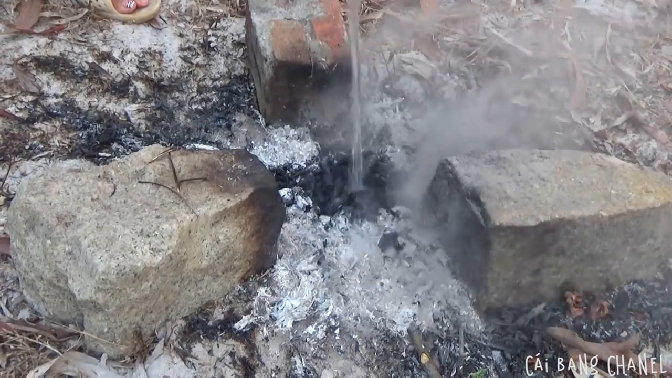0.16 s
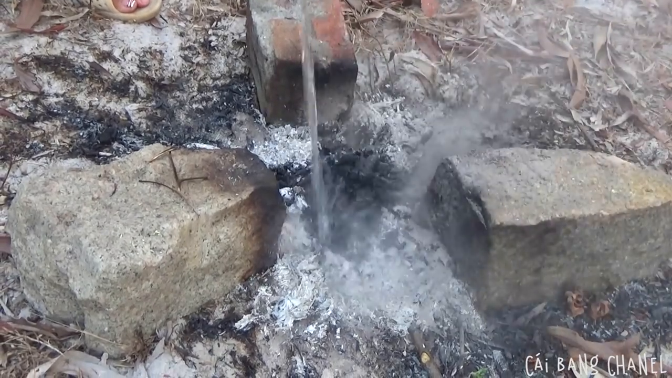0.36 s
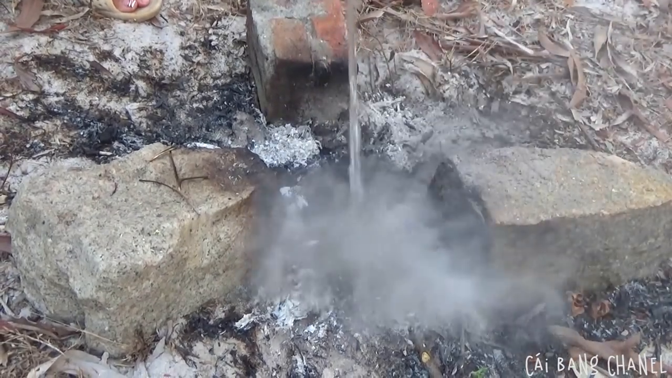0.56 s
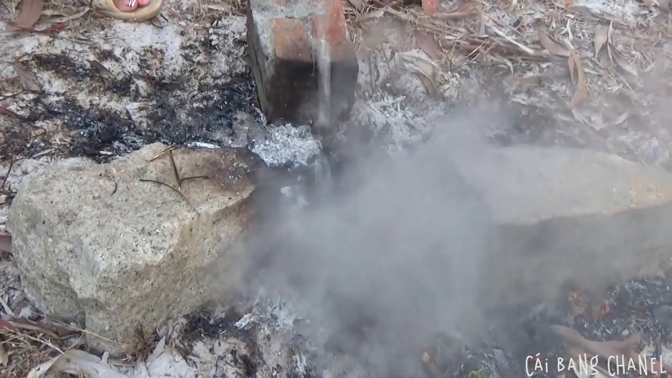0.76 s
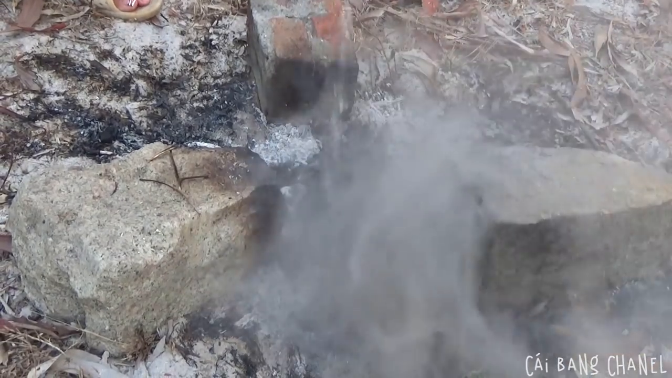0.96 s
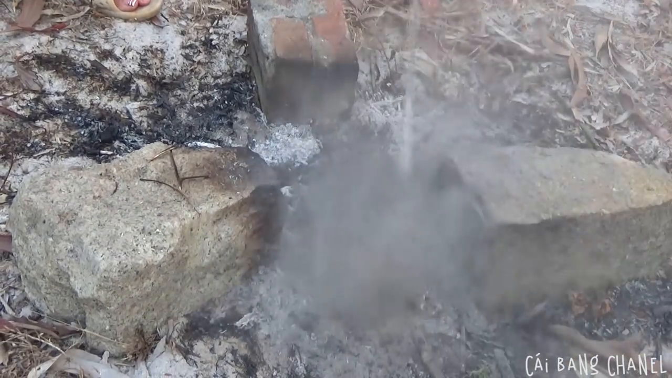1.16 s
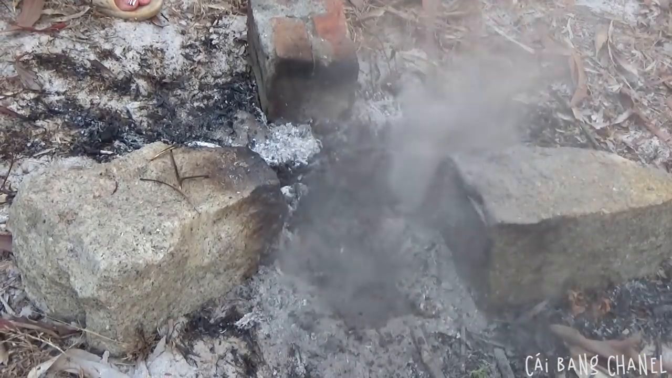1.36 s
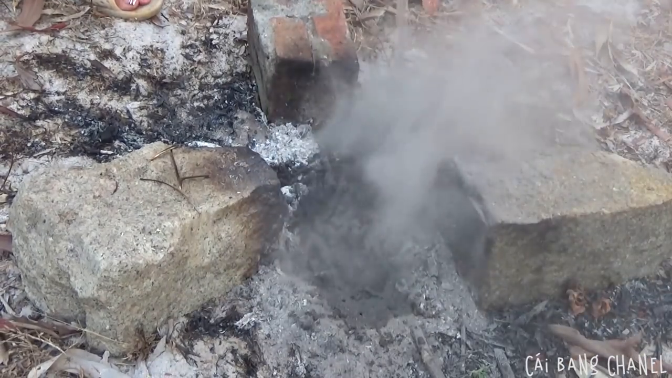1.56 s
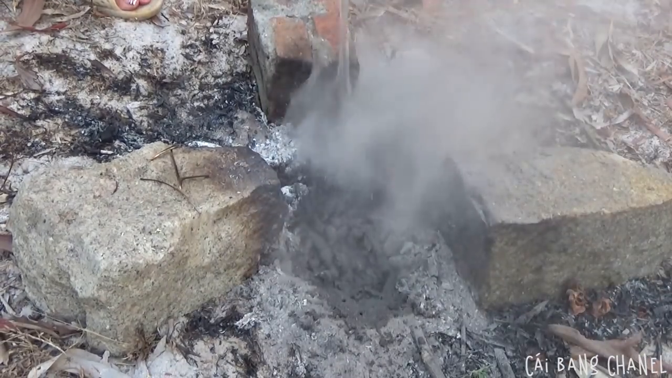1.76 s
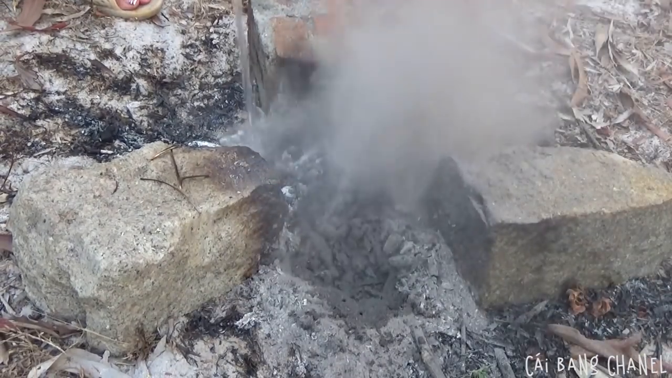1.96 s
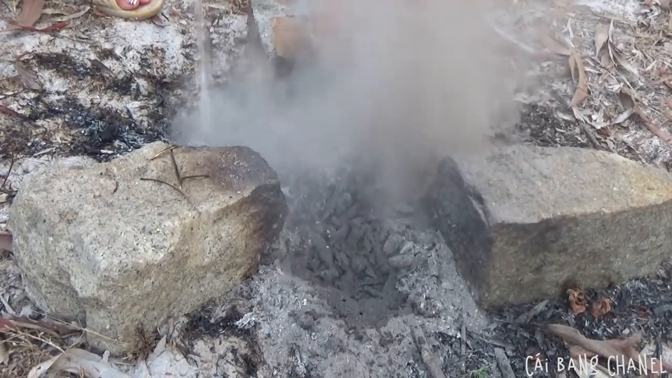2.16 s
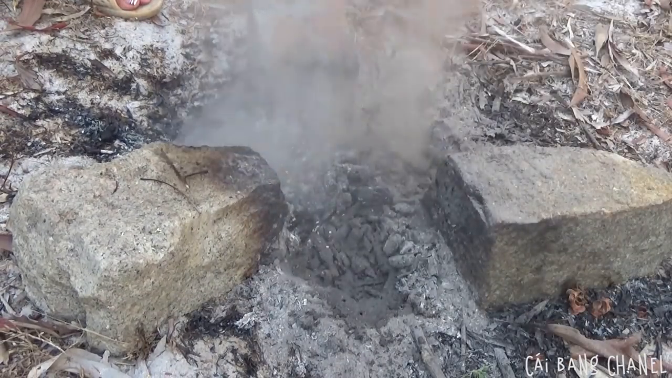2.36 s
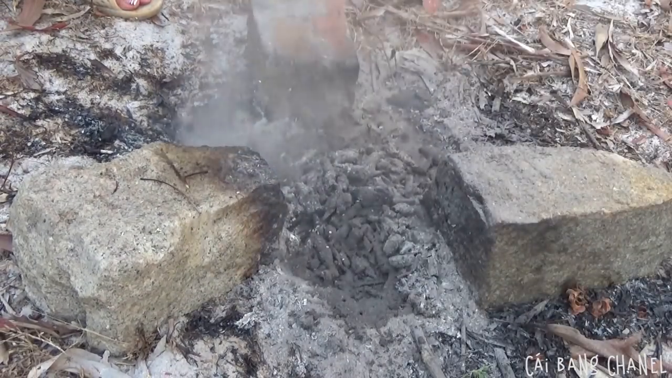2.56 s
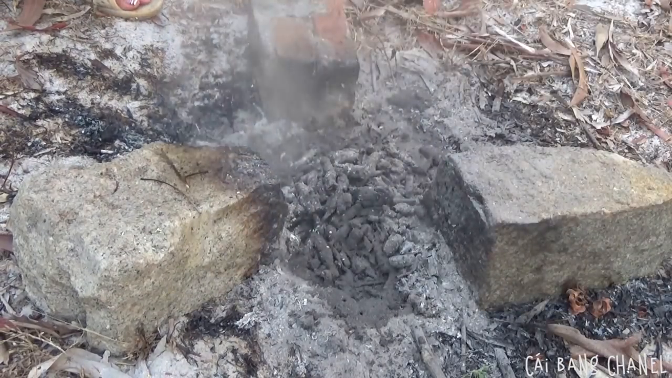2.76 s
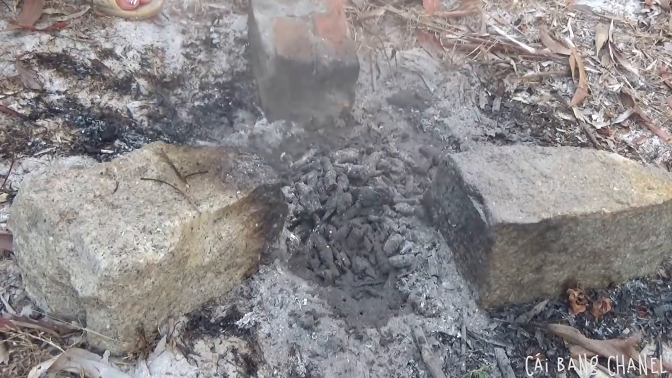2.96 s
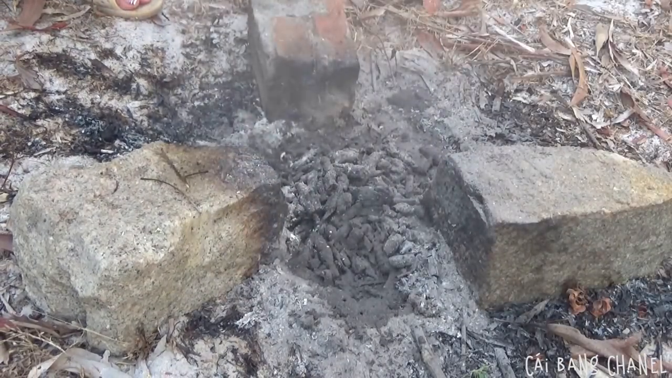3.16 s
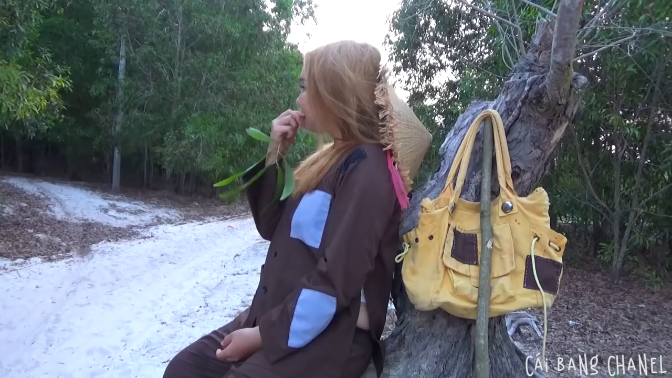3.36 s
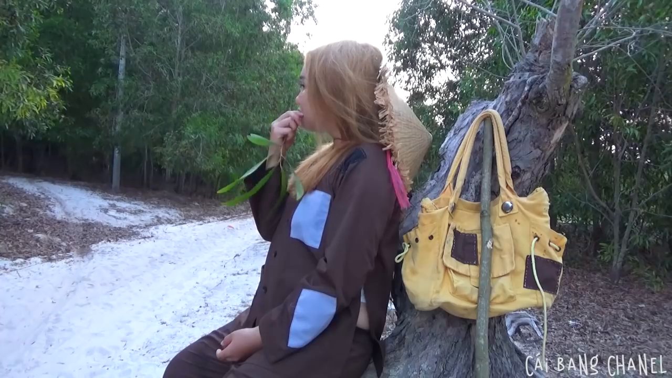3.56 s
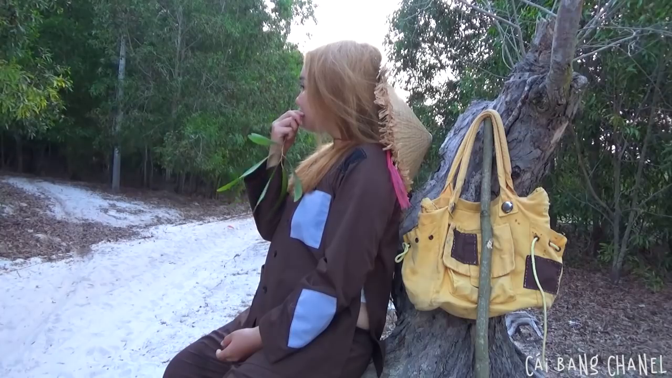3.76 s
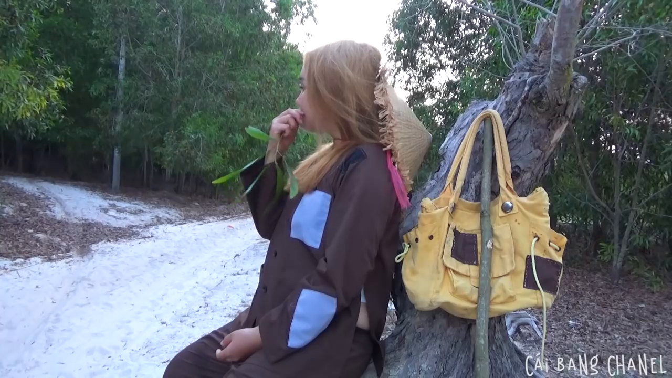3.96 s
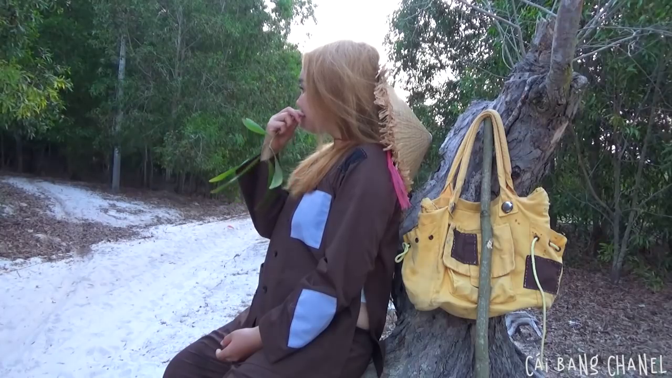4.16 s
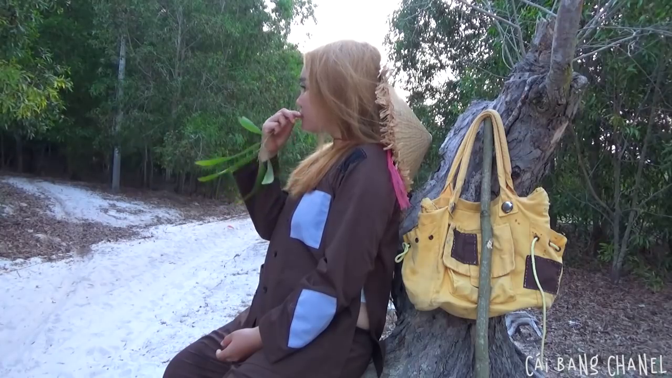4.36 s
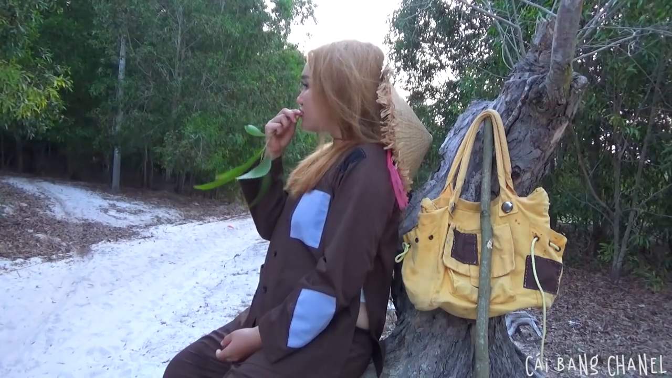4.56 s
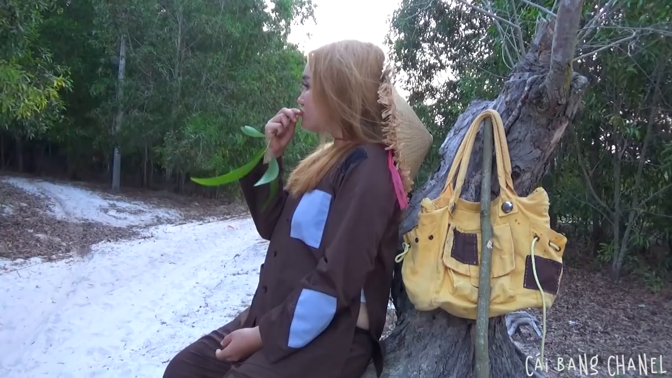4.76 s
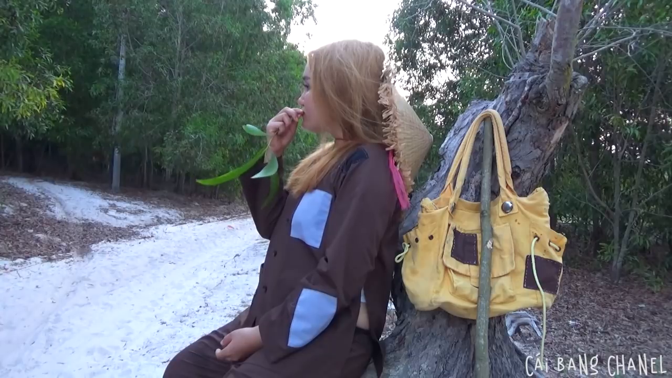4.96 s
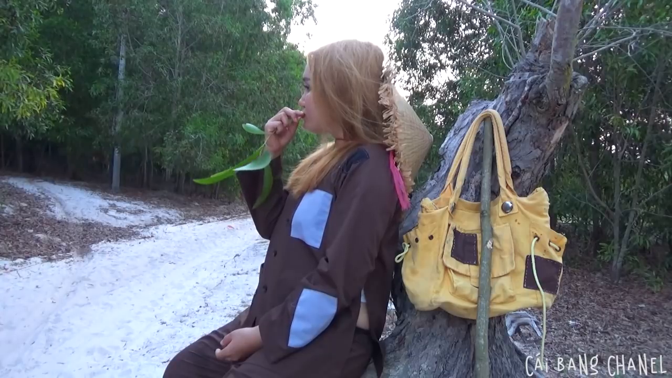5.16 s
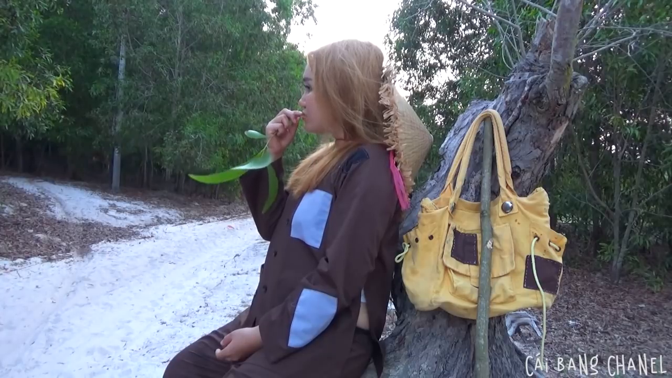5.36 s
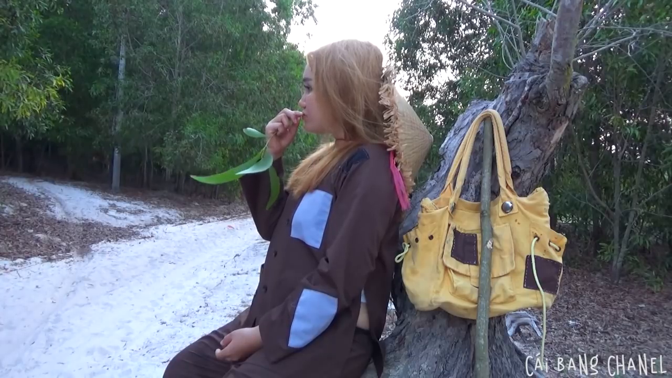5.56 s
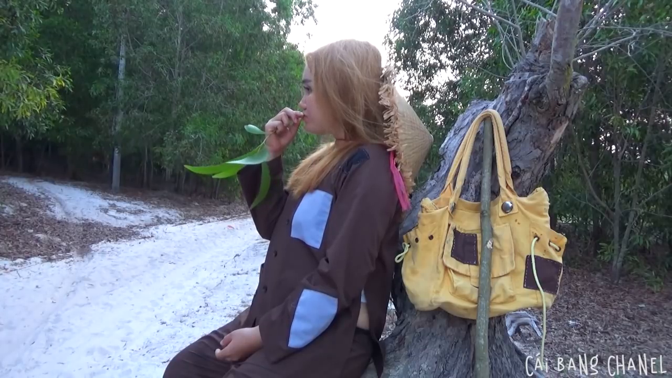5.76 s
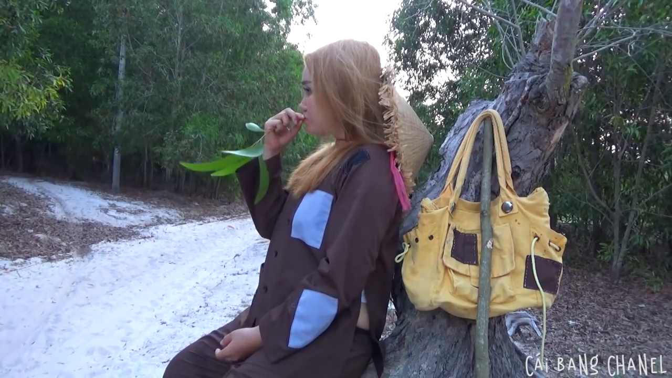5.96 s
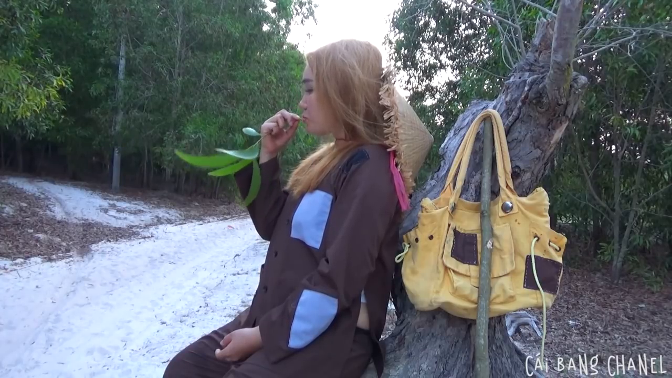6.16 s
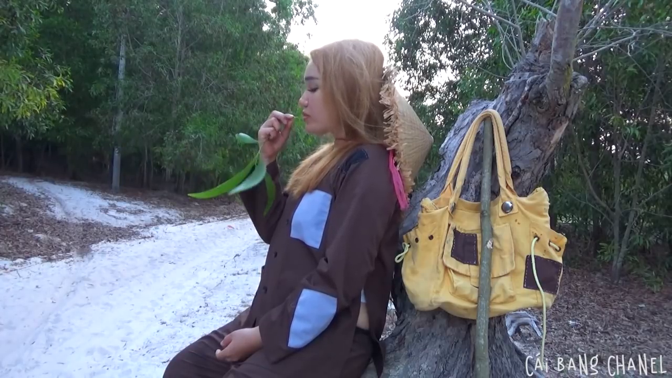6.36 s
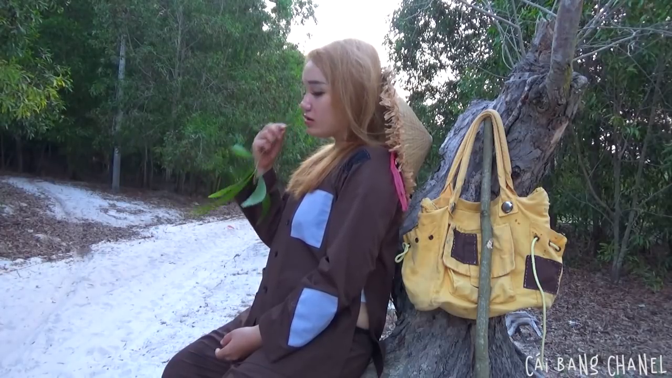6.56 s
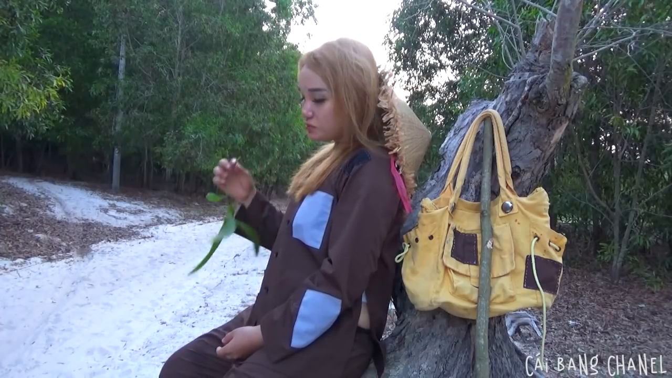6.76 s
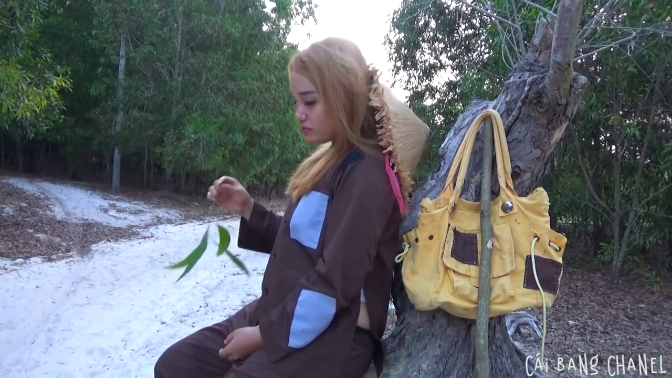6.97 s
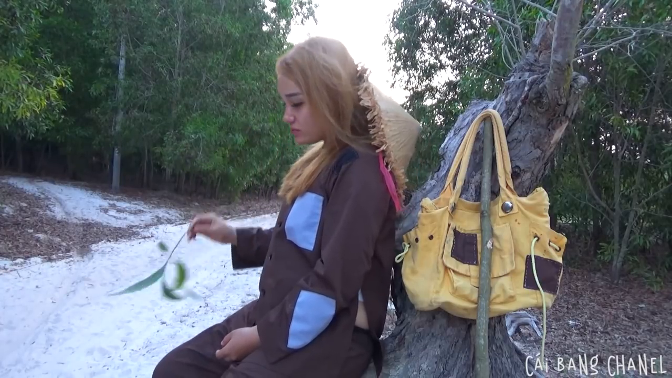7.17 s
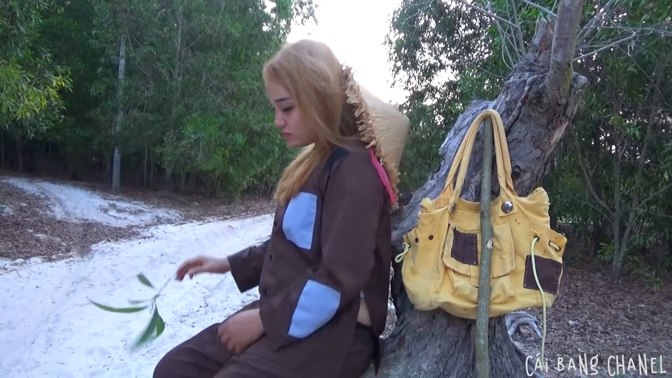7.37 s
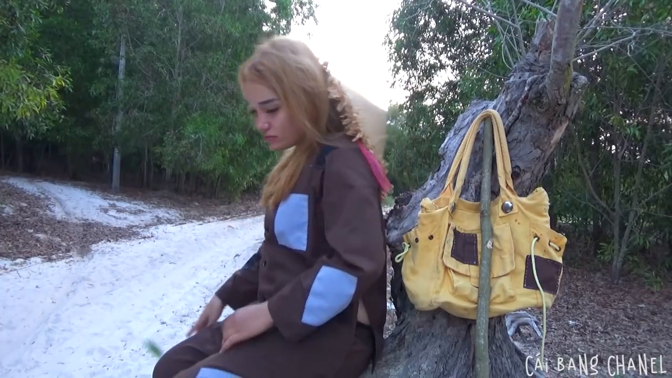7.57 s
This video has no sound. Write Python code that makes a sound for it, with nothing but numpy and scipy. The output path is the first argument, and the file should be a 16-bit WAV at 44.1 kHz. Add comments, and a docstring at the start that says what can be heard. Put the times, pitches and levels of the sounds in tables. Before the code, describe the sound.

Outdoors, a stream of water quenches a fire pit right before the microphone, fizzing and hissing unevenly while muddy ash spits, bubbles and pops. The hiss weakens and stops at a hard cut. A faint, spacious woodland follows: airy rumble, far engine, high insect shimmer, runs of falling bird chips and slurred whistles with a tail among the trees. Finally dry leaves-and-cloth strokes and small ticks come very near, slightly left.

```python
"""At the fire pit, water is poured on hot embers between stones: filtered noise and clicks make the steam's hiss,
short puffs and ringing bubbles sputter up through the wet ash, and a few coals crack.
The pour ends and the hiss settles to a simmer. A hard cut leads to a wide, quiet forest path: noise air, a far
engine's hum, a shrill noise band of insects, and two kinds of bird as gliding tones echoed by the trees.
Last, close to the microphone, a leafy twig and clothes rustle as grains, brushed noise and ticks."""
import sys
import numpy as np
from scipy import signal
from scipy.fft import rfft, irfft
from scipy.io import wavfile
from scipy.ndimage import uniform_filter1d

SR = 44100
rng = np.random.default_rng(int(sys.argv[2]) if len(sys.argv) > 2 else 0)


def unload_audio(sound):
    """Save the sound as a 16-bit wav file, at the path given as the first command line argument."""
    columns = np.transpose(np.atleast_2d(sound))
    # keep every value between -1 and 1, then stretch to whole-number steps
    steps = np.round(np.clip(columns, -1, 1) * 32767)
    wavfile.write(sys.argv[1], SR, steps.astype(np.int16))


N = 339570
TIME = np.arange(N) / SR  # seconds
BINS = np.fft.rfftfreq(N, 1 / SR)  # Hz

# Tones of the steam, fine fizz, broad hiss and low simmer: pitch_hz, relative level_db (per Hz)
FIZZ_TONE = [(3000, -30), (6000, -11.5), (8000, -7.5), (10000, -2.5), (12500, -2), (15500, 2), (17000, -5)]
HISS_TONE = [(100, -37), (500, -10), (750, -0.5), (1100, -1.5), (1500, -0.5), (2500, 0.5), (3400, 2.5),
             (6000, 1), (9000, -3), (16000, -7.5)]
SIMMER_TONE = [(25, -32.5), (60, -16.5), (130, -8), (230, -1), (380, -2.5), (550, -14.5), (1200, -23.5),
               (4000, -43)]
# How hard the coals steam as the stream wanders over them and stops:
# start_s, fizz level_db, hiss level_db (before the lift in steam())
STEAMING = [(0.0, -20.5, -30.5), (0.05, -27, -27), (0.07, -23.5, -30.5), (0.2, -19.5, -31),
            (0.44, -26, -31), (0.48, -22.5, -27), (0.52, -21.5, -29), (0.73, -22.5, -28), (1.04, -21, -34),
            (1.15, -21, -30.5), (1.18, -23.5, -31), (1.65, -20.5, -32), (1.88, -27, -32),
            (1.99, -20.5, -28), (2.39, -22, -32.5), (2.44, -26, -33.5), (2.79, -30, -38.5),
            (3.35, -33, -39.5)]
# The stream meets fresh coals and the hiss flares: start_s, length_s, level_db
FLARES = [(.034, 0.015, -22.5), (.466, 0.017, -25.5), (1.928, 0.067, -30.5)]
FLARE_ATTACK_S, FLARE_RELEASE_S = 0.006, 0.015
SIMMER_AT_0_DB_FIZZ, SIMMER_FOLLOWS = -37, 0.33  # dB; dB of simmer per dB of fizz


def steam():
    """Countless tiny jets: a bright fizz over a broad hiss, with the low simmer of the soaked bed."""
    boiling = np.interp(TIME, [2.3, 2.7], [1, 0.4])  # the jets steady once the water has soaked in
    fizz_gain = level(STEAMING)

    spit = unit(colour(clicks(per_s=1000, spread_db=5.5), read(FIZZ_TONE, BINS)))
    fizz = unit(noise(FIZZ_TONE, patchy_db=1.28) + 0.34 * boiling * spit)
    fizz = fizz * amp(0.6 * boiling * drift(per_s=30) + 0.3)

    hiss = noise(HISS_TONE, patchy_db=1.38) * amp(0.36 * boiling * drift(per_s=86))
    steady_gain = level(STEAMING, column=2) * amp(2.5)
    hiss_gain = np.hypot(steady_gain, surges(FLARES, FLARE_ATTACK_S, FLARE_RELEASE_S))

    simmer = noise(SIMMER_TONE, patchy_db=1.0) * amp(SIMMER_AT_0_DB_FIZZ) * fizz_gain ** SIMMER_FOLLOWS
    return fizz * fizz_gain + hiss * hiss_gain + simmer


# Flurries of steam bursting through wet ash: start_s, length_s, level_db (before each layer's trim)
FLURRIES = [(0, 0.053, -28), (.275, .045, -29.5), (.463, 0.049, -21.5), (.615, 0.17, -26),
            (.722, 0.054, -21), (.828, 0.042, -25), (.88, 0.057, -31.5), (1.312, .16, -24.5),
            (1.518, 0.031, -24.5), (1.562, .04, -24.5), (1.775, 0.027, -28.5), (1.925, 0.058, -30.5),
            (2.075, 0.069, -28), (2.135, 0.12, -24.5), (3.087, 0.035, -38.5)]
FLURRY_ATTACK_S, FLURRY_RELEASE_S = 0.0095, 0.023
IDLE_DB = -20  # sputtering between flurries, relative to the fizz gain, before each layer's trim


def sputtering():
    """Gain of the sputtering mud: flurries over a low level that follows the steam."""
    flurries = surges(FLURRIES, FLURRY_ATTACK_S, FLURRY_RELEASE_S)
    return np.hypot(flurries, level(STEAMING) * amp(IDLE_DB))


# Tone of a puff of steam through mud: pitch_hz, relative level_db (per Hz)
PUFF_TONE = [(25, -33.5), (60, -22), (130, -8.5), (250, 1), (380, 5), (520, -1.5), (800, 2), (1150, 0),
             (1700, -3.5), (2300, -5.5), (2900, -11.5), (5000, -15), (9000, -33.5), (16000, -38)]


def sputter():
    """Flurries of steam pockets burst through the mud; each is a push and a short puff."""
    bursts = clicks(per_s=600, spread_db=3)
    venting = signal.lfilter([1], [1, -np.exp(-1 / (0.003 * SR))], bursts ** 2)  # power dies away in 3 ms
    puffs = unit(np.sqrt(venting) * rng.standard_normal(N))
    drive = unit(bursts + 0.54 * puffs)
    return unit(colour(drive, read(PUFF_TONE, BINS))) * sputtering() * amp(-2.0)


def bubbles(count=14):
    """Small bubbles of all sizes ride on each flurry and ring for a few cycles, rising as they surface."""
    out, t = np.zeros(N), np.arange(2048) / SR
    for hz in np.geomspace(280, 2200, count):
        cycles = hz * t
        ring = np.sin(2 * np.pi * cycles * (1 + 0.0047 * cycles)) * np.exp(-cycles / 5.1)
        ringing = signal.oaconvolve(clicks(per_s=28, spread_db=1), ring)[:N]
        out += amp(read(PUFF_TONE, hz) / 2) * unit(ringing)  # half the puff's dB contour
    return unit(out) * sputtering() * amp(-10.0)


# The biggest bubbles: start_s, level_db, pitch_hz, t60_s
POPS = [(.738, -20, 611, .029), (.7622, -14, 1360, 0.0074), (.846, -14.5, 1500, 0.023),
        (1.398, -17, 370, 0.027), (1.407, -11, 700, 0.013), (1.425, -14, 750, 0.025),
        (1.5401, -12, 1400, .01), (1.572, -7.5, 1420, 0.0052), (1.583, -4, 1090, 0.0046),
        (1.596, -15, 825, 0.014), (1.79, -11, 1400, 0.0089), (2.155, -14, 750, .052),
        (2.236, -13.5, 870, 0.017), (2.527, -32.5, 633, 0.067), (2.558, -32, 566, 0.05),
        (3.093, -27, 790, .029), (3.12, -25.5, 740, .04)]


def pops():
    """A big bubble snaps open and its cavity rings for a few cycles."""
    out, t = np.zeros(N), np.arange(4096) / SR
    for start_s, level_db, pitch_hz, t60_s in POPS:
        onset = 1 - np.exp(-t / 0.00008)
        ring = np.cos(2 * np.pi * pitch_hz * t) * amp(-60 * t / t60_s) * onset
        snap = 0.21 * rng.standard_normal(len(t)) * np.exp(-t / 0.0005)
        add(out, start_s, amp(level_db) * (ring + snap))
    return out


# Quenched coals crack: start_s, level_db (before the halving in snaps()), pitch_hz, t60_s
CRACKS = [(.232, -14.5, 12960, .004), (.327, -27, 10950, .004), (.502, -11.5, 12000, .004),
          (1.899, -16, 13000, .005)]
# Twig and leaf ticks close by: the same columns
TICKS = [(6.573, -40, 5150, 0.0087), (6.634, -32.5, 2970, 0.016), (6.653, -41, 4760, .012),
         (6.783, -35.5, 1510, 0.0072), (6.809, -32.5, 517, 0.022), (6.845, -36, 5540, .012),
         (7.046, -34, 6330, .02), (7.3955, -34, 8000, .01), (7.4048, -25.5, 8800, 0.023),
         (7.439, -31, 8860, 0.013)]


def snaps(rows, crack_s):
    """Something brittle snaps: a crack and a very short ring."""
    out, t = np.zeros(N), np.arange(2048) / SR
    for start_s, level_db, pitch_hz, t60_s in rows:
        crack = 0.5 * rng.standard_normal(len(t)) * np.exp(-t / crack_s)
        ring = 0.5 * np.sin(2 * np.pi * pitch_hz * t) * amp(-60 * t / t60_s)
        add(out, start_s, amp(level_db) * (crack + ring))
    return out


def stone_echo(x, delay_s, echo_db, dull_hz):
    """A stone beside the coals throws the sound back; its rough face scatters the treble away."""
    bounce = amp(echo_db) * np.exp(-2j * np.pi * BINS * delay_s) / (1 + (BINS / dull_hz) ** 4)
    return irfft(rfft(x) * (1 + bounce), N)


# Width of the pit: pitch_hz, side minus mid level_db
PIT_SIDE = [(40, -15), (130, -26), (380, -21), (700, -22.5), (1200, -37), (2000, -70), (4000, -54)]


def fire_pit():
    """The fire pit, narrow and straight ahead of the microphone; its small vents radiate no deep bass."""
    pit = stone_echo(steam() + sputter() + bubbles(), delay_s=0.00141, echo_db=-13, dull_hz=2900)
    pit = pit + pops() + snaps(CRACKS, crack_s=0.0005)
    no_bass = signal.butter(2, 50, "highpass", fs=SR, output="sos")
    return spread(signal.sosfilt(no_bass, pit), PIT_SIDE)


# Tones of crackling leaves and of a brushing sleeve: pitch_hz, relative level_db (per Hz)
LEAVES_TONE = [(1500, -26), (3000, -11.5), (4800, -12.5), (6200, -8), (7500, -2.5), (9200, 2.5),
               (10300, -3.5), (12000, -36)]
CLOTH_TONE = [(100, -25), (350, 8), (600, 1), (1200, 0), (2000, 1), (3000, -7), (5000, -9), (10000, -40)]
# Strokes of the arm with the twig: peak_s, rise_s, fall_s, leaves level_db, cloth level_db
# (both levels before the lifts in rustle())
STROKES = [(6.81, .02, 0.015, -70, -57), (6.975, 0.032, .015, -55.5, -69), (7.115, 0.06, 0.042, -51, -68),
           (7.148, 0.034, 0.021, -60, -53), (7.405, 0.0098, .04, -44.5, -64),
           (7.525, 0.051, 0.041, -44.5, -60), (7.605, .025, 0.037, -42.5, -61.5),
           (7.685, 0.04, .05, -43.5, -50)]
# Leaves and sleeve keep stirring between strokes, before the same lifts
STIR_LEAVES_DB, STIR_CLOTH_DB = -63.5, -65
STIR_FROM_S, STIR_FULL_S = 6.6, 6.83


def rustle():
    """An arm lowers a leafy twig in a few strokes: leaves crackle in fine grains, the sleeve brushes."""
    stir = np.interp(TIME, [STIR_FROM_S, STIR_FULL_S], [0, 1])
    leaf_power = (amp(STIR_LEAVES_DB) * stir) ** 2
    cloth_power = (amp(STIR_CLOTH_DB) * stir) ** 2
    for peak_s, rise_s, fall_s, leaves_db, cloth_db in STROKES:
        width_s = np.where(TIME < peak_s, rise_s, fall_s)
        speed = np.exp(-((TIME - peak_s) / width_s) ** 2)
        leaf_power = leaf_power + speed * amp(leaves_db) ** 2
        cloth_power = cloth_power + speed * amp(cloth_db) ** 2
    grains = unit(colour(clicks(per_s=900, spread_db=2.0), read(LEAVES_TONE, BINS)))
    leaves = unit(noise(LEAVES_TONE, patchy_db=3.0) + grains) * amp(1.5)
    cloth = noise(CLOTH_TONE, patchy_db=1.7) * amp(3.5)
    return leaves * np.sqrt(leaf_power) + cloth * np.sqrt(cloth_power)


def slur(length_s, first_hz, last_hz, bend):
    """A near-sine note that falls fastest at first, levels out by its bend, and flutters a little."""
    u = np.linspace(0, 1, int(length_s * SR))
    fall = (np.exp(-bend * u) - np.exp(-bend)) / (1 - np.exp(-bend))
    flutter = unit(uniform_filter1d(rng.standard_normal(SR), size=300))[:len(u)]
    hz = (last_hz + (first_hz - last_hz) * fall) * (1 + 0.0041 * flutter)
    swell = np.sqrt(abs(np.sin(np.pi * u)))
    return np.sin(2 * np.pi * np.cumsum(hz) / SR) * swell * amp(2 * flutter)


def trees(x, t60_s, wet_db):
    """Trunks scatter a sound into a thin tail."""
    t = np.arange(SR) / SR
    taps = rng.standard_normal(SR) * (rng.random(SR) < 2000 / SR) * amp(-60 * t / t60_s)
    return x + amp(wet_db) * signal.fftconvolve(x, taps / np.linalg.norm(taps))[:N]


# A small bird's runs of falling chips: start_s, length_s, spacing_s, first chip level_db, first chip pitch_hz
RUNS = [(4.037, .33, .072, -53, 7320), (5.244, .5, 0.076, -57, 7460), (6.396, .17, 0.074, -60, 7500),
        (6.899, .16, .064, -54.5, 6700)]
CHIP_S, CHIP_FALL = 0.037, 0.15  # each chip drops by this share of its pitch
RUN_SAG_HZ_PER_S, RUN_SWELL_DB_PER_S = 1300, 16  # a run sinks and grows louder
# Longer notes, one far and low, two slurred and nearer: start_s, length_s, level_db, first pitch_hz, last pitch_hz
WHISTLES = [(4.288, 0.158, -60.5, 1142, 1089), (6.484, 0.21, -56.5, 3530, 2845),
            (6.851, .22, -53, 3720, 2616)]


def birds():
    """Runs of high chips and a few longer notes, heard through the trees."""
    chips, whistles = np.zeros(N), np.zeros(N)
    for start_s, length_s, spacing_s, level_db, pitch_hz in RUNS:
        for t in np.arange(0, length_s, spacing_s):
            hz = pitch_hz - RUN_SAG_HZ_PER_S * t
            chip = slur(CHIP_S, hz, hz * (1 - CHIP_FALL), bend=0.89)
            add(chips, start_s + t, amp(level_db + RUN_SWELL_DB_PER_S * t) * chip)
    for start_s, length_s, level_db, first_hz, last_hz in WHISTLES:
        add(whistles, start_s, amp(level_db) * slur(length_s, first_hz, last_hz, bend=4.0))
    return trees(chips, t60_s=0.35, wet_db=-7) + trees(whistles, t60_s=1.2, wet_db=-1)


# Tone of the shrill band near 6.4 kHz: pitch_hz, relative level_db (per Hz)
SHRILL_TONE = [(5000, -57), (5750, -21), (6100, -3), (6400, 0), (6800, -3.5), (7200, -15), (7800, -36),
               (9000, -62)]
# Level of the shrill band, insects together with a blur of bird chips,
# before the small wavering in insects(): start_s, level_db
SHRILL_LEVEL = [(3.42, -62), (4.17, -53.5), (4.43, -60), (5.29, -57.5), (5.48, -57), (5.93, -59),
                (6.28, -56), (6.55, -60), (7.38, -51.5)]


def insects():
    """A shrill noise band, distant insects blurred with bird chips, and a faint trill pulsing 25 times a second."""
    wavering = amp(-0.66 + 0.77 * drift(per_s=14))
    shrill = noise(SHRILL_TONE, patchy_db=1.9) * level(SHRILL_LEVEL) * wavering
    pulse = np.sin(np.pi * 25 * TIME) ** 4
    trill = amp(-66.5) * np.sin(2 * np.pi * 2090 * TIME + 0.87 * drift(per_s=25))
    rasp_tone = [(2400, -31.5), (2950, -12), (3400, -8.0), (4200, -29)]  # pitch_hz, relative level_db
    rasp = amp(-67) * noise(rasp_tone, patchy_db=0.0)
    return shrill + pulse * (trill + rasp)


# Tone of the forest air: pitch_hz, relative level_db (per Hz)
AIR_TONE = [(25, -10), (55, 0), (125, 2.5), (200, -1.5), (300, -7), (500, -12), (950, -15), (1500, -19),
            (2500, -21.5), (3200, -20), (5000, -24.5), (8500, -26), (10300, -30.5)]
AIR_DB = -53  # the level wavers around this
HUM_HZ, HUM_END_DB, HUM_RISE_DB_PER_S = 136.5, -55, 4  # a far engine draws nearer


def distance():
    """Air in the trees as noise, and the wavering hum of a far engine as a phase-drifting sine."""
    air = noise(AIR_TONE, patchy_db=1) * amp(AIR_DB + 0.77 * drift(per_s=6.4))
    hum = np.sin(2 * np.pi * HUM_HZ * TIME + 1.4 * drift(per_s=2.4))
    return air + hum * amp(HUM_END_DB + HUM_RISE_DB_PER_S * (TIME - TIME[-1]))


# Width of the forest: pitch_hz, side minus mid level_db
PATH_SIDE = [(40, -34), (120, -30), (200, -21), (380, -9), (700, -4.5), (1300, -2.5), (4400, -5.5),
             (8000, -8.5)]
SECOND_SHOT_BAND_LIMIT_HZ = 10450


def forest_path():
    """The wide forest around the microphone, with the twig close and a little to the left."""
    twig = spread(rustle() + snaps(TICKS, crack_s=0.0031), [(700, -20), (8000, -19)])
    around = spread(distance() + insects() + birds(), PATH_SIDE)
    path = around + twig * amp([[1.0], [-1.0]])  # dB left, right
    return low_pass(path, SECOND_SHOT_BAND_LIMIT_HZ)


def amp(db):
    """Decibels to gain."""
    return 10 ** (np.asarray(db) / 20)


def unit(x):
    """Scales to rms 1."""
    return x / np.sqrt(np.mean(x ** 2) + 1e-20)


def read(points, hz):
    """A spectrum's dB, joined on a log-frequency axis."""
    f, db = np.transpose(points)
    return np.interp(np.log(hz + 1), np.log(f + 1), db)


def level(rows, column=1):
    """One dB column of a curve, as a gain for every sample."""
    rows = np.array(rows)
    return amp(np.interp(TIME, rows[:, 0], rows[:, column]))


def surges(rows, attack_s, release_s):
    """Gain of a set of bursts: each rises, holds for the rest of its length, and dies away."""
    power = np.zeros(N)
    for start_s, length_s, level_db in rows:
        rise = np.clip((TIME - start_s) / attack_s, 0, 1)
        decay = np.exp(-np.maximum(TIME - start_s - length_s, 0) / release_s)
        power += (amp(level_db) * rise * decay) ** 2
    return np.sqrt(power)


def add(mix, start_s, sound):
    """Mixes a sound in at its start time."""
    part = mix[max(round(start_s * SR), 0):][:len(sound)]
    part += sound[:len(part)]


def shape(x, spectrum):
    """Gives a noise the tone of a spectrum."""
    return irfft(rfft(x) * amp(read(spectrum, BINS)), N)


def colour(x, db):
    """Causal (minimum-phase) filter with the given dB at BINS, so that clicks keep their sharp front."""
    cepstrum = irfft(np.log(amp(db)), N)
    cepstrum[1:N // 2] *= 2
    cepstrum[N // 2 + 1:] = 0
    return irfft(rfft(x) * np.exp(rfft(cepstrum)), N)


def drift(per_s):
    """Slow chance of rms 1."""
    return unit(irfft(rfft(rng.standard_normal(N)) / (1 + (BINS / per_s) ** 4), N))


def noise(spectrum, patchy_db):
    """Coloured noise whose level wanders in patches some 700 Hz wide and 40 ms long."""
    z = signal.stft(rng.standard_normal(N), nperseg=512)[2]
    patches = uniform_filter1d(rng.standard_normal(z.shape), size=8, axis=0)
    patches = unit(uniform_filter1d(patches, size=7, axis=1))
    patchy = signal.istft(z * amp(patchy_db * patches), nperseg=512)[1][:N]
    return unit(shape(patchy, spectrum))


def clicks(per_s, spread_db):
    """Random impulses, mostly small and a few large."""
    size = amp(spread_db * np.minimum(rng.exponential(1, N), 3)) * rng.choice([-1, 1], N)
    return unit(size * (rng.random(N) < per_s / SR))


def spread(x, side):
    """A weaker, phase-scrambled side signal follows the sound's own spectrum and gives it width."""
    z = signal.stft(x, SR, nperseg=1024)[2]
    scrambled = signal.istft(z * np.exp(2j * np.pi * rng.random(z.shape)), nperseg=1024)[1][:N]
    s = shape(unit(scrambled) * np.std(x), side)
    return np.array([x + s, x - s])


def low_pass(x, hz):
    """Steep band limit on both channels."""
    taps = signal.firwin(701, hz, window=("kaiser", 9), fs=SR)
    return signal.oaconvolve(x, taps[None], "same")


CUT_S = 3.365


def scene():
    """The fire pit, then a hard cut to the forest path."""
    return np.where(TIME < CUT_S, fire_pit(), forest_path())


def record(dry):
    """The recorder's band limit."""
    return low_pass(dry, 15800)


dry = scene()
out = record(dry)
unload_audio(out)
```